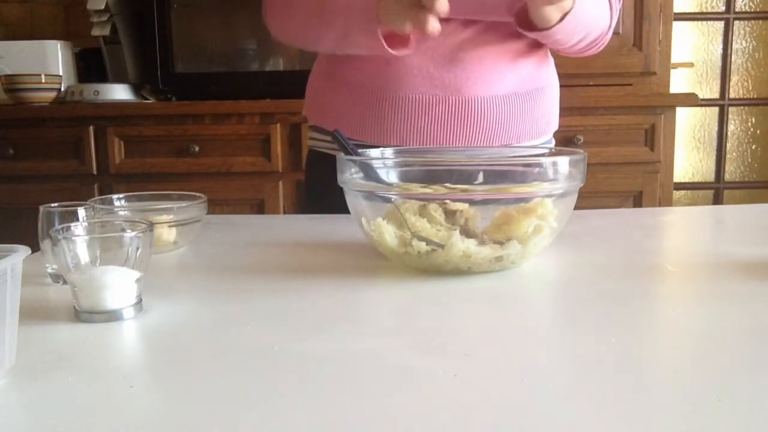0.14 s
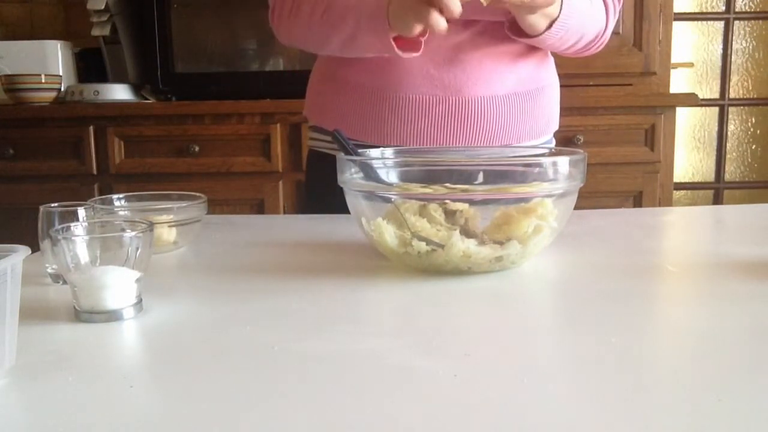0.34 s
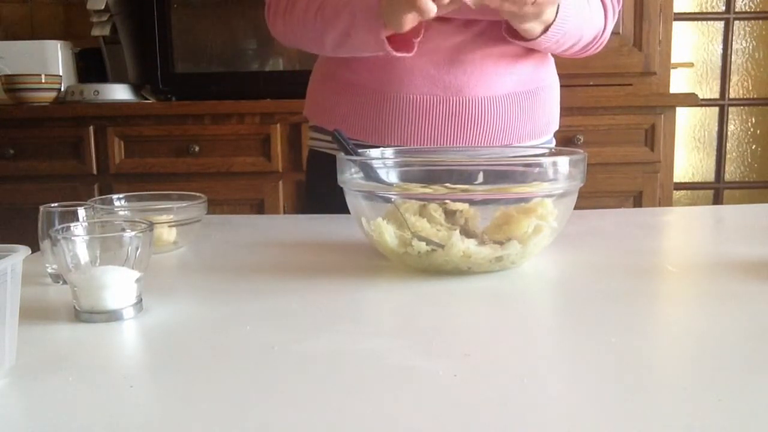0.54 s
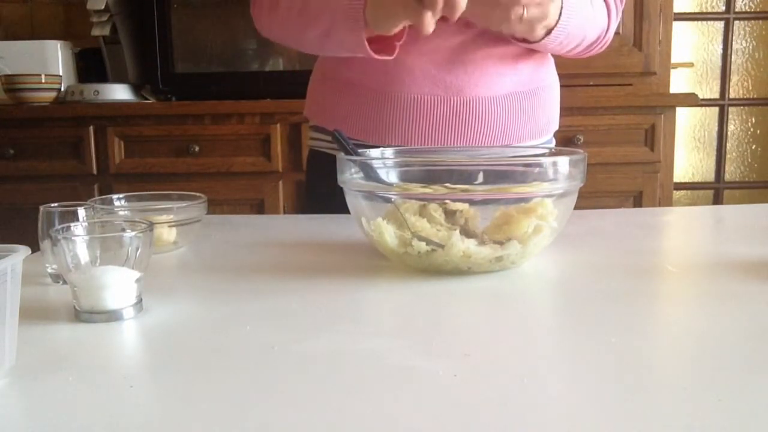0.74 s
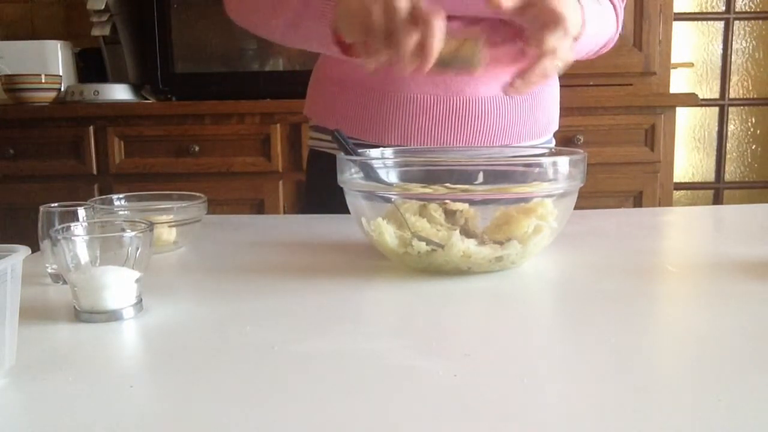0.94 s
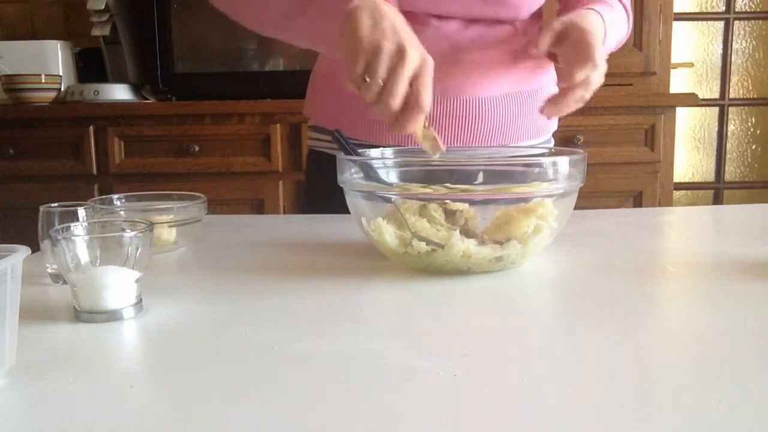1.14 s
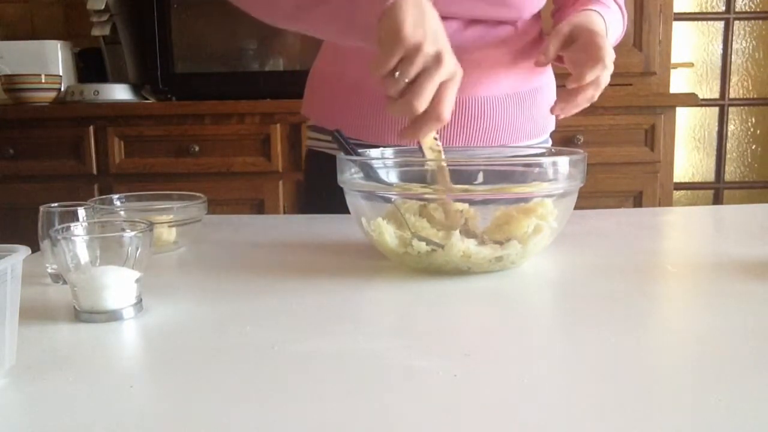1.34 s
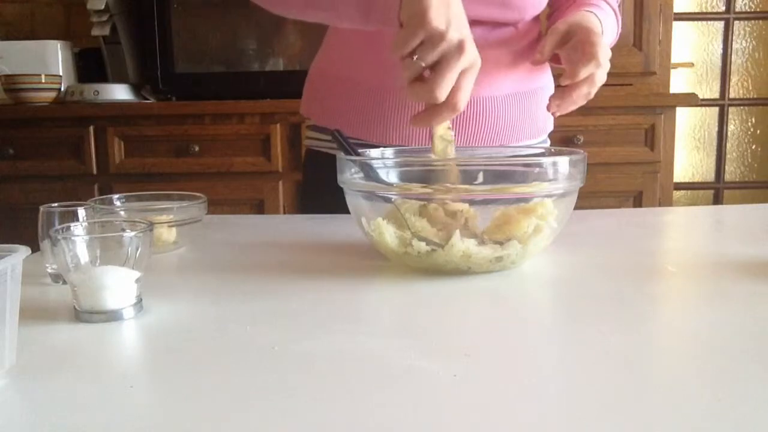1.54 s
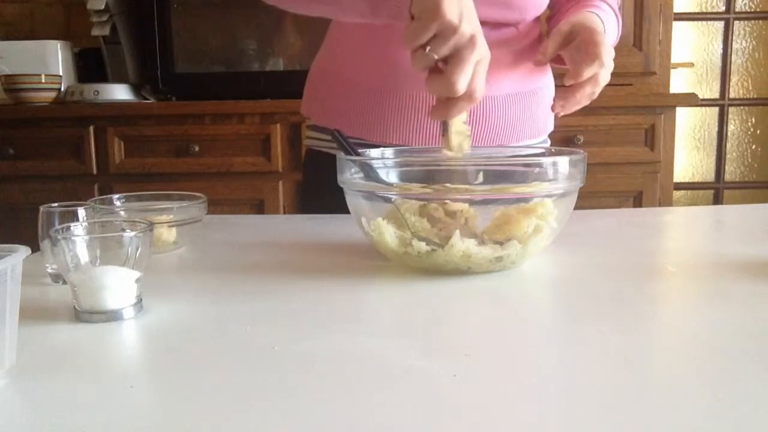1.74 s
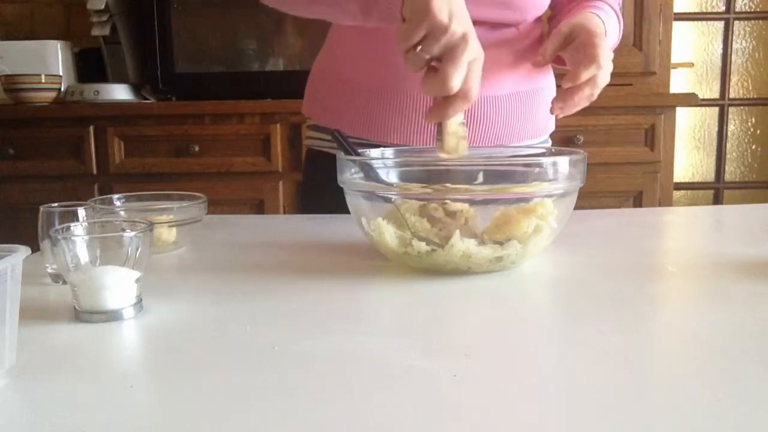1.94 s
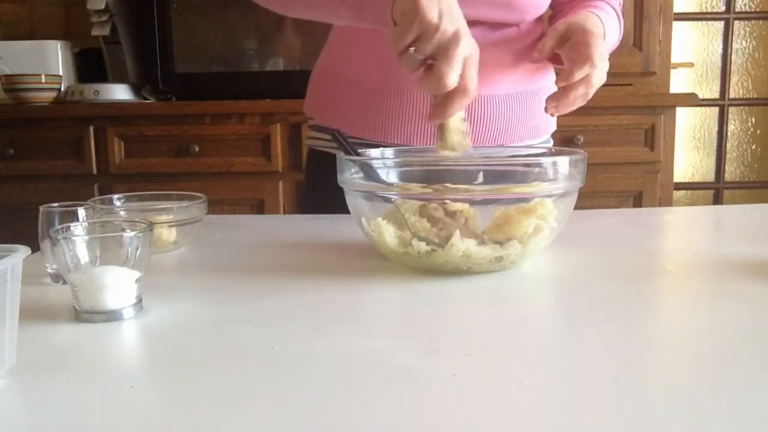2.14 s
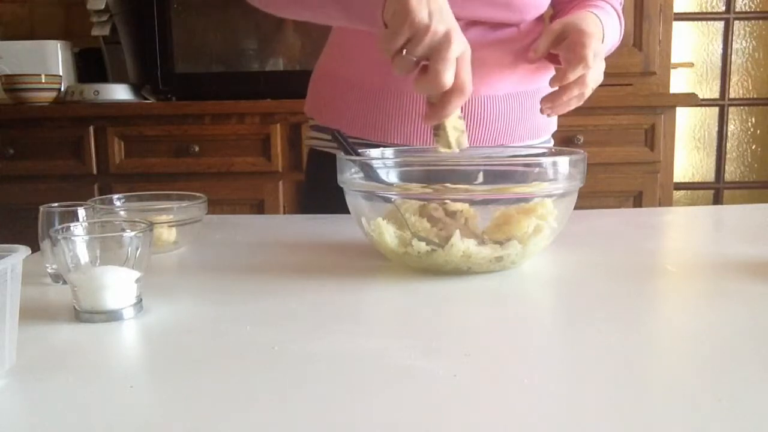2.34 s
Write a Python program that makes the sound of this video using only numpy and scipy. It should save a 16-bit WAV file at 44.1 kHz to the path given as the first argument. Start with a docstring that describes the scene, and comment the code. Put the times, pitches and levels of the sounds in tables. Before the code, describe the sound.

A small paper sachet tears with a loud crisp snap and a few crackles, then fine sugar hisses out, thinning in shakes with small paper ticks; quiet hard-walled kitchen, one microphone, same on both channels.

```python
"""A low, slightly wavering hush fills a quiet kitchen: shaped noise, there from start to end.
A paper sachet is torn open: fibres part in a burst of random clicks, and folds snap and creak as short
crackles, each with its own ring and tone. Then sugar slides out in a dense, lumpy hiss of tiny pitched ticks
with a dull paper rustle, thinning as the sachet is shaken empty while the paper still snaps.
A fading noise tail gives the hard room's echo. One microphone, the same on both channels."""
import sys
import numpy as np
from scipy import signal
from scipy.io import wavfile
from scipy.ndimage import uniform_filter1d

SR = 44100
rng = np.random.default_rng(int(sys.argv[2]) if len(sys.argv) > 2 else 0)


def pcm_store(signal):
    """Save signal as 16-bit PCM."""
    levels = np.round(np.clip(np.atleast_2d(signal), -1, 1) * 32767)
    wavfile.write(sys.argv[1], SR, levels.astype(np.int16).T)


N = 105840  # length in samples (2.4 s)

# Background hush, its tone before the overall level is set: f/Hz, level per Hz/dB
HUSH_COLOUR = [(25, -52), (70, -38), (100, -26.5), (135, -14), (155, -5.5), (190, 1), (220, -7), (250, 0.5),
               (310, -7.5), (450, -4.5), (600, -10.5), (730, -16), (1020, -7), (1300, -12), (1600, -16.5),
               (2700, -17.5), (3900, -16.5), (4500, -17.5), (9000, -19.5), (15500, -19.5)]
HUSH_DB, HUSH_PATCH_DB = -60, 1  # overall level; typical swell of its patches

# How long each band of the echo takes to fall by 60 dB: f/Hz, t/s
ECHO_FADE = [(400, 0.68), (1300, 0.47), (3500, 0.43), (8000, 0.37), (14000, 0.22)]
# Tone the walls give the echo: f/Hz, level/dB
WALL_COLOUR = [(300, -3), (1800, 1.5), (3500, -1), (14000, -1)]
FIRST_WALL_S, BUILD_S = .0025, .005  # delay of the first echo; time constant of the build-up
SNAP_ROOM_DB, POUR_ROOM_DB, ECHO_LUMPS_DB = 0, -7.5, 2  # sent to the room: paper, sugar; lumps in the echo

# The flow of sugar: t/s, hiss level/dB, paper rustle level against the hiss/dB
POUR_LEVELS = [(1.09, -66, -15), (1.114, -60, -18), (1.13, -51, -9), (1.18, -41, -14),
               (1.362, -43.5, -12.5), (1.41, -41.5, -12), (1.422, -45, -8), (1.57, -44, -16),
               (1.61, -41, -12), (1.786, -47.5, -13.5), (1.804, -43.5, -12.5), (1.888, -49.5, -9.5),
               (1.924, -46, -9.5), (1.968, -49, -13), (2.092, -52, -11.5), (2.118, -47, -12),
               (2.192, -52.5, -12), (2.268, -50, -13.5), (2.296, -57.5, -15), (2.322, -49.5, -24),
               (2.334, -49, -14), (2.4, -53, -11)]
# Tone of the sugar hiss: f/Hz, level per Hz/dB
SUGAR_COLOUR = [(1470, -31), (2500, -12), (3140, -11.5), (4230, -1), (5450, -1), (6640, -1), (10700, -1.5),
                (12500, 0.5), (14700, -2), (15500, 1)]
# Tone of the paper rustle: f/Hz, level per Hz/dB
RUSTLE_COLOUR = [(150, -38), (550, -8.5), (800, -9), (1200, -5.5), (1800, -0.5), (3000, 1.5), (4500, -13)]
GRAINS_PER_S, GRAIN_SPREAD_DB = 12000, 1  # ticks over all pitches together; spread of their loudness
CLUMP_DB, PATCH_DB = 0.4, 1.46  # typical swell of the clumps, and of patches in the hiss
CRYSTAL_T60_S = 0.0016  # time for a tick to fall by 60 dB

# Loudness of the parting fibres: t/s, level/dB
TEAR_LEVELS = [(.16, -81), (.2, -55), (.24, -47.5), (.25, -50.5), (.272, -39.5), (.285, -66)]
# Tone of the parting fibres: f/Hz, level per Hz/dB
TEAR_COLOUR = [(100, -60), (500, -19), (1500, 1.5), (4000, -2.5), (10000, -1), (15500, -5)]

# Where the tone of each snap is listed: f/Hz
SNAP_HZ = [350, 800, 1400, 2200, 3500, 5500, 8500, 13000]
# Paper snaps: t/s, energy level/dB, level sent to the room against that/dB, crackle length/s,
# fade over that length/dB, first click before doubling/dB, ring f/Hz, ring level/dB,
# then the tone as level per Hz/dB at each SNAP_HZ, before the ring is added
PAPER_SNAPS = [(0.2057, -10.5, -4.5, 0.0027, 11.5, 0, 598, 8.9, -9, -8, -11, -16, -10, -11, -19, -18.5),
               (.2733, -0.5, -4, 0.0038, -20, 7, 5000, 1.7, -38, -22, -21, -10, -4, -2, -7.5, -15.5),
               (.4200, -28, 0, 0.011, -8, -6, 2470, 13, -40, -17, -13, -7, -13.5, -10, -39, -36),
               (0.5138, -27.5, -2.5, 0.0081, -21, 0, 1910, 12, 0.5, -19, -18, -9, -16, -24, -16.5, -32),
               (.5310, -34.5, -4, 0.0095, -12, 5, 2050, 9.8, -12, -2, -35, -5, -25, -30, -35, -35),
               (0.588, -32, -5, 0.0041, 2, -3, 561, 10, -12, -19, -7, -37, -27, -38, -37, -35),
               (.6043, -18.5, -8.5, 0.0029, -5, 9, 500, 13.6, -1.5, -4, -2, 5, -1, -3, -14, -13),
               (0.615, -14, -1.5, 0.0039, -15, 3, 5760, 3.9, -17, -18, -10, -9.5, -14, -11, -18.5, -21),
               (0.8448, -19.5, 1.5, .0035, 0, -12, 1080, 13, -47, -16, -14, -2.5, 0.5, -10.5, -16.5, -21.5),
               (.9670, -34.5, 3.5, 0.0014, -8, -3, 4050, 4, -29, -28, -6, 12, 12, 11, 10, -4),
               (1.061, -33.5, 1, 0.0091, -10, -4, 5650, 12, -34, -31, -22, -15, -16, -15, -23, -20),
               (1.0420, -35.5, 6, .02, -10, -6, 9900, 8, -35, -27, -33, -32, -28, -15, -11, -11),
               (1.425, -30, -4, 0.0053, -7, -13, 1100, 6.2, -6, 7, 8, -9, -10, -4, -18, -12),
               (1.8050, -21, 2, 0.025, -4, -6, 4800, 11, -36, -29, -24, -12, -8, 1, -11, -7),
               (1.915, -23, -8, 0.0047, -8, -5, 5040, 5, -20, -16, -2, 2, -8, -4, -6, 0),
               (2.1183, -23.5, -11, 0.0054, -10, 0, 4930, 5.8, -33, -31, -16, -15, -14, 8, -8, -11),
               (2.1242, -30, -10, .004, -6, -2, 5160, 5.5, -30, -18, -5, -8, -16, 7, -8, -5),
               (2.2728, -21, -1, 0.0043, -6, -3, 9000, 3, -37, -31, -11, -19, -18, -10, -11, -7),
               (2.3295, -24, -10, 0.0044, -6, -5, 4800, 5, -33.5, -29, -20, -9, -8, -1, -21, -3)]
RING_WIDTH = .1  # share of the ring's pitch
BASS_CUT_DB = -48  # at 100 Hz, against the first tone value: paper has no bass down there

EDGE_HZ = 15260  # treble limit of the microphone signal


def gain_of(db):
    """Turns dB into a factor."""
    return 10 ** (np.asarray(db) / 20)


def evened(x):
    """Scales a signal to an average strength (rms) of 1."""
    return x / np.sqrt(np.mean(x ** 2) + 1e-20)


def read(points, hz):
    """Reads values between the listed pitches, on a log-frequency axis."""
    f, value = np.transpose(points)
    return np.interp(np.log(hz + 1), np.log(f + 1), value)


def colour(x, points, size=2048):
    """Gives a sound a tone with a minimum-phase filter, which never answers before the sound arrives."""
    hz = abs(np.fft.fftfreq(size, 1 / SR))
    log_gain = np.log(gain_of(read(points, hz)))
    response = np.exp(np.conj(signal.hilbert(log_gain)))
    taps = np.fft.ifft(response).real
    return signal.oaconvolve(x, taps[:size // 2])[:len(x)]


def curve(rows, column):
    """Reads one column of a time table at every sample."""
    rows = np.array(rows)
    return np.interp(np.arange(N) / SR, rows[:, 0], rows[:, column])


def grains(per_s, spread_db):
    """Random clicks, most small and a few large."""
    u = rng.random((N, 3))
    sign = np.sign(u[:, 0] - .5)
    size = gain_of(-spread_db * np.log(1 - .99 * u[:, 1]))
    happens = u[:, 2] < per_s / SR
    return sign * size * happens


def patchy(x, patch_db, size=256):
    """Lets patches of the sound, in time and pitch, swell and sink at random."""
    overlap = size * 3 // 4
    z = signal.stft(x, nperseg=size, noverlap=overlap)[2]
    field = rng.standard_normal(z.shape[::-1]).T
    field = uniform_filter1d(field, size=6, axis=0)
    field = evened(uniform_filter1d(field, size=12, axis=1))
    return signal.istft(z * gain_of(patch_db * field), nperseg=size, noverlap=overlap)[1][:len(x)]


def hush():
    """The room's low, slightly wavering hush and the microphone's hiss, as shaped noise."""
    # The extra start is cut off so that the filter has settled
    steady = colour(rng.standard_normal(N + 4096), HUSH_COLOUR, size=8192)[4096:]
    return gain_of(HUSH_DB) * evened(patchy(steady, HUSH_PATCH_DB, size=2048))


def kitchen(x):
    """Dense, lumpy echo that builds from the first wall, each band dying at its own speed."""
    size = SR // 2
    t = np.arange(size) / SR
    lumpy = patchy(rng.choice([-1., 1.], size), ECHO_LUMPS_DB, size=128)
    hz, frame_s, z = signal.stft(lumpy, SR, nperseg=128)
    fade_db = -60 * frame_s / read(ECHO_FADE, hz)[:, None]
    tail = signal.istft(z * gain_of(fade_db), SR, nperseg=128)[1][:size]
    build_up = 1 - np.exp(-np.maximum(t - FIRST_WALL_S, 0) / BUILD_S)
    tail = colour(tail, WALL_COLOUR) * build_up
    return signal.fftconvolve(x, tail / np.linalg.norm(tail))[:N]


def crystals(count=24):
    """Crystals give tiny fading ticks, a millisecond or so long, each at one of a set of pitches."""
    t, out = np.arange(256) / SR, np.zeros(N)
    for hz in np.linspace(1500, 15500, count):
        tick = np.sin(2 * np.pi * hz * t) * gain_of(-60 * t / CRYSTAL_T60_S)
        out += signal.oaconvolve(grains(GRAINS_PER_S / count, GRAIN_SPREAD_DB), tick)[:N]
    return out


def pour():
    """Crystals tick on paper in small clumps; the paper adds a duller rustle."""
    clumps = uniform_filter1d(rng.standard_normal(N), size=150)
    clumps = evened(uniform_filter1d(clumps, size=150))
    hiss = evened(patchy(colour(crystals(), SUGAR_COLOUR), PATCH_DB))
    rustle = evened(colour(grains(2500, 1.4), RUSTLE_COLOUR))
    flowing = np.arange(N) / SR > POUR_LEVELS[0][0]
    level = flowing * gain_of(curve(POUR_LEVELS, column=1) + CLUMP_DB * clumps)
    return level * (hiss + gain_of(curve(POUR_LEVELS, column=2)) * rustle)


def tear():
    """Fibres part in a dense crackle that swells towards the big snap."""
    t = np.arange(N) / SR
    tearing = (t > TEAR_LEVELS[0][0]) & (t < TEAR_LEVELS[-1][0])
    crackle = evened(colour(grains(3600, 0.84), TEAR_COLOUR))
    return tearing * gain_of(curve(TEAR_LEVELS, column=1)) * crackle


def snaps():
    """A click, then milliseconds of crackle, in the colour of that fold; also a bare click for the walls."""
    near, walls, t = np.zeros(N + 1024), np.zeros(N + 1024), np.arange(1024) / SR
    hz = np.geomspace(100, 16000, 300)
    for row, noise in zip(PAPER_SNAPS, rng.standard_normal((len(PAPER_SNAPS), 1024))):
        s, db, room_db, length, fade_db, click_db, ring_hz, ring_db, *shade = row
        fold_db = read([(hz[0], shade[0] + BASS_CUT_DB), *zip(SNAP_HZ, shade)], hz)
        ring = ring_db / (1 + ((hz / ring_hz - 1) / RING_WIDTH) ** 2)
        fold = list(zip(hz, fold_db + ring))
        ending = np.clip((length - t) * 2000, 0, 1)  # the last half millisecond closes smoothly
        crackle = noise * gain_of(fade_db * t / length) * ending
        crackle[0] = gain_of(click_db) * 2
        click = 1. * (t == 0)
        for mix, push, push_db in ((near, crackle, db), (walls, click, db + room_db)):
            snap = colour(push, fold)
            mix[round(s * SR):][:1024] += gain_of(push_db) * snap / np.linalg.norm(snap)
    return near[:N], walls[:N]


def scene():
    """Sachet and sugar in the kitchen, over the hush, the same on both channels."""
    (near, walls), fibres, sugar = snaps(), tear(), pour()
    echo = kitchen(gain_of(SNAP_ROOM_DB) * (walls + fibres) + gain_of(POUR_ROOM_DB) * sugar)
    mono = near + fibres + sugar + echo + hush()
    return np.array([mono, mono])


def record(dry):
    """Takes away the treble above the limit with a steep low-pass filter."""
    low_pass = signal.firwin(767, EDGE_HZ, window=("kaiser", 9), fs=SR)
    return signal.oaconvolve(dry, low_pass[None], "same")


dry = scene()
out = record(dry)
pcm_store(out)
```